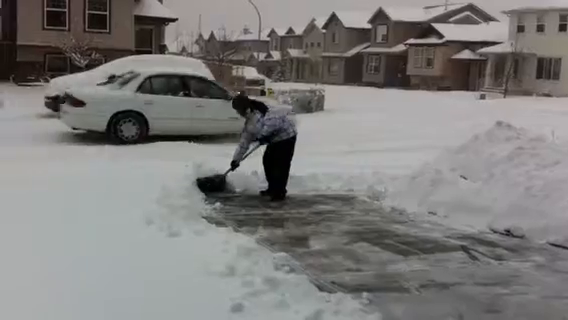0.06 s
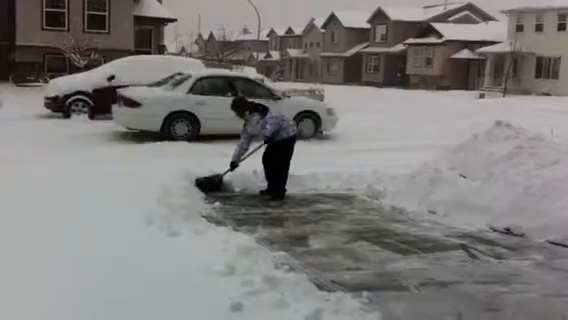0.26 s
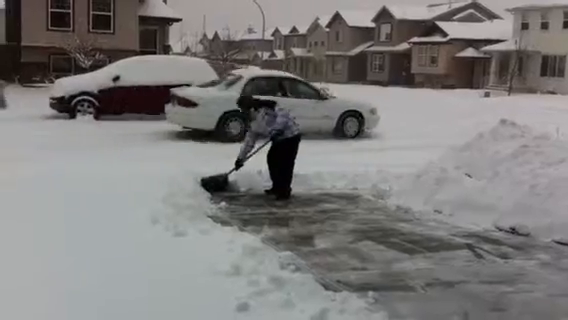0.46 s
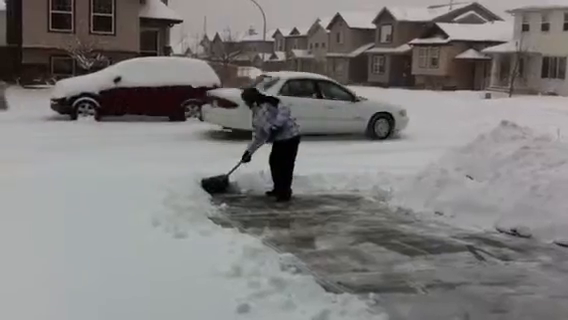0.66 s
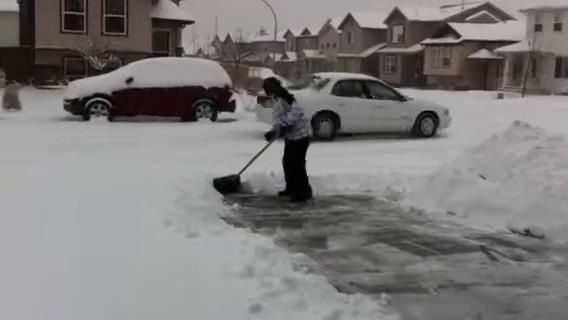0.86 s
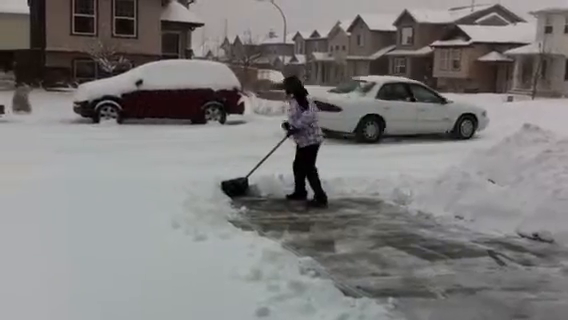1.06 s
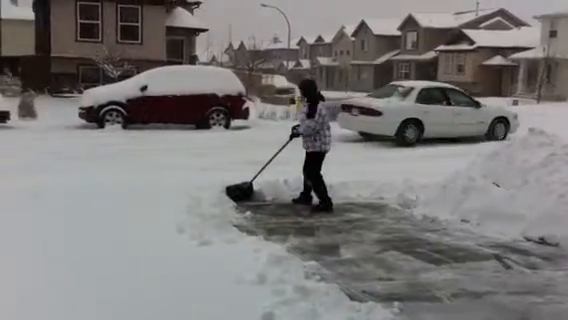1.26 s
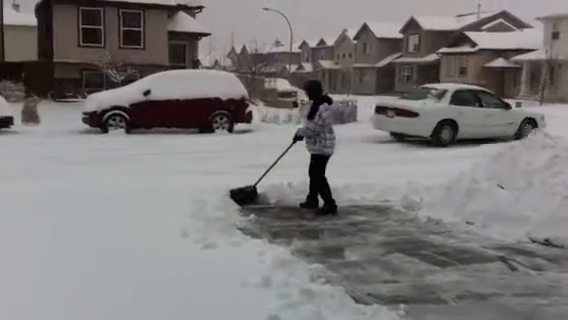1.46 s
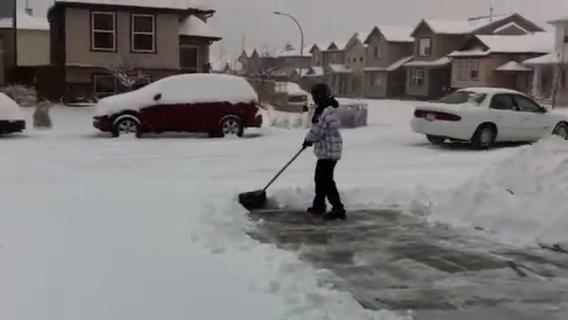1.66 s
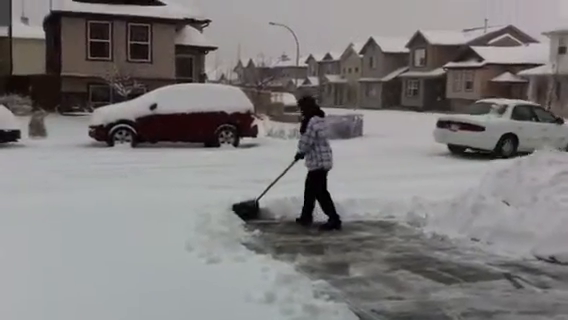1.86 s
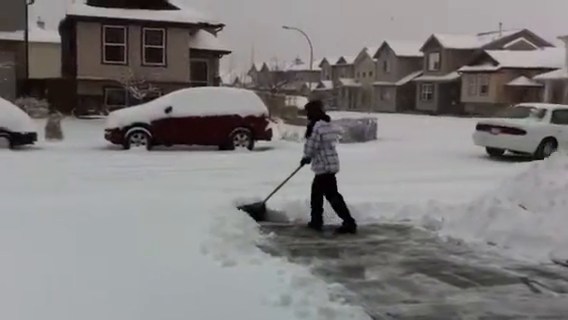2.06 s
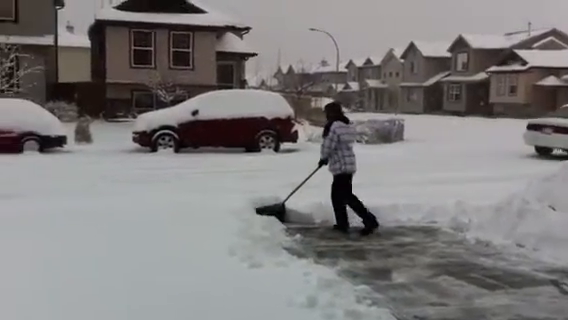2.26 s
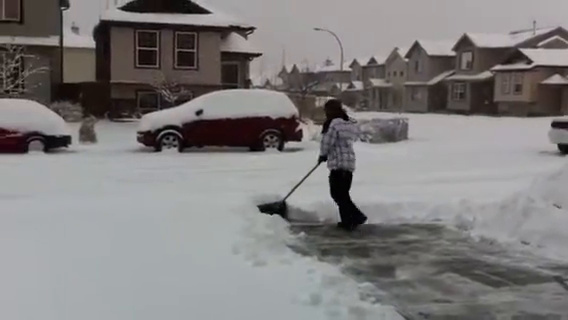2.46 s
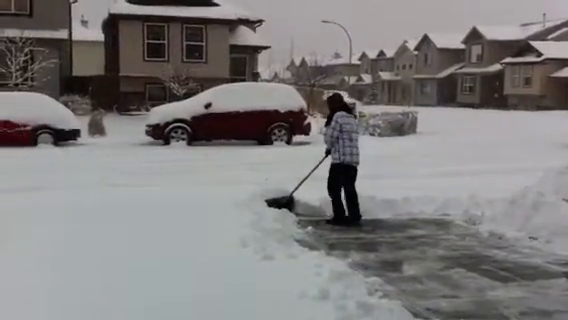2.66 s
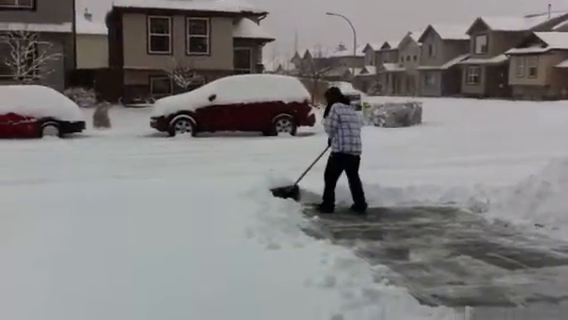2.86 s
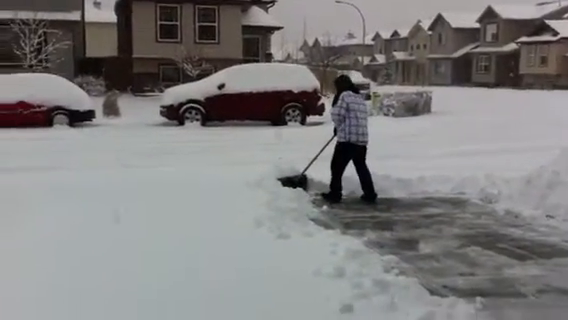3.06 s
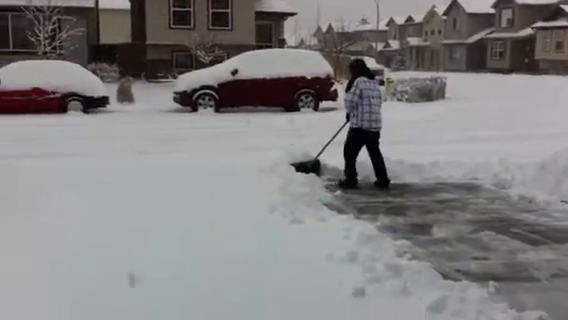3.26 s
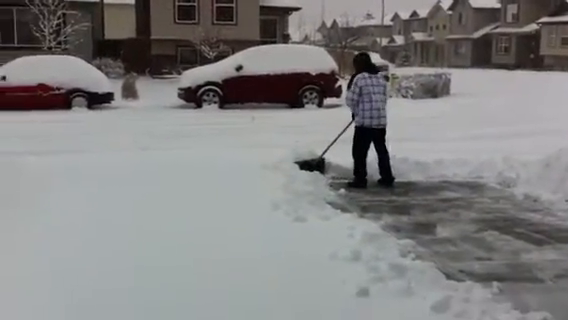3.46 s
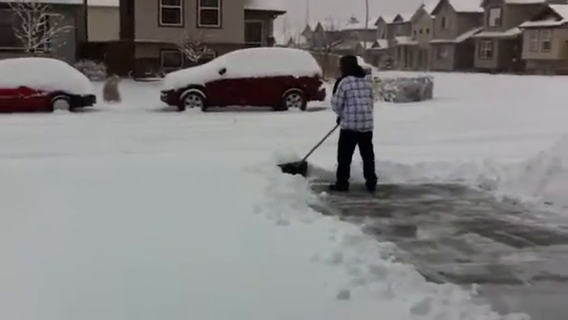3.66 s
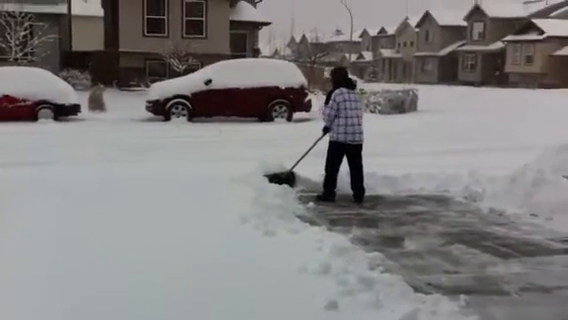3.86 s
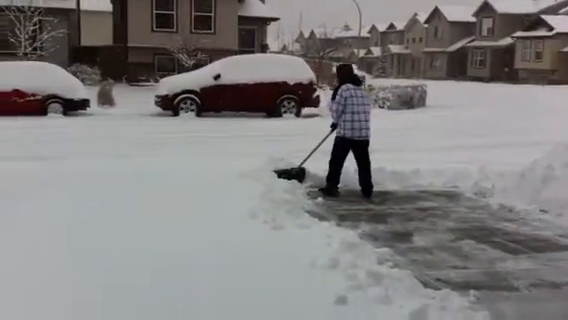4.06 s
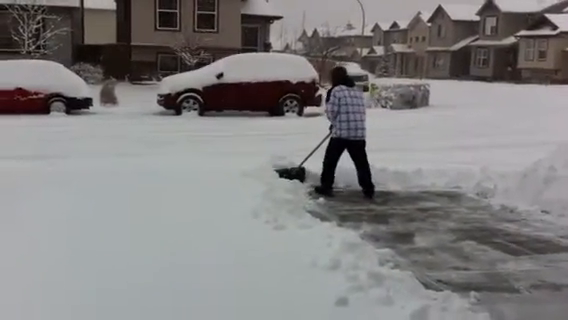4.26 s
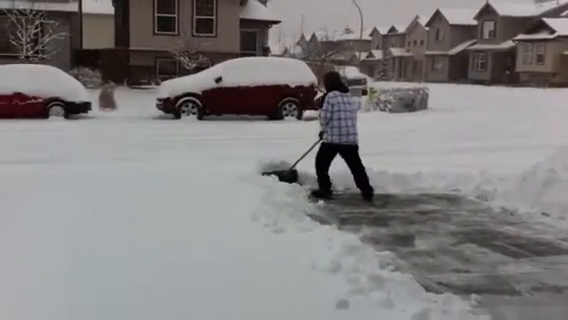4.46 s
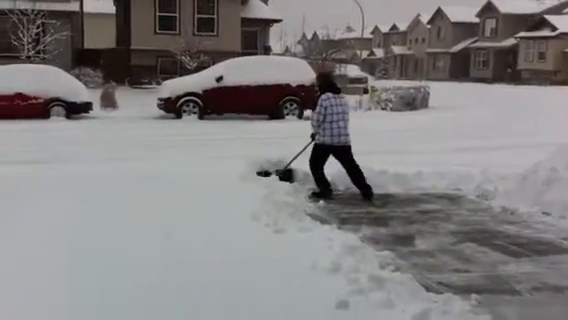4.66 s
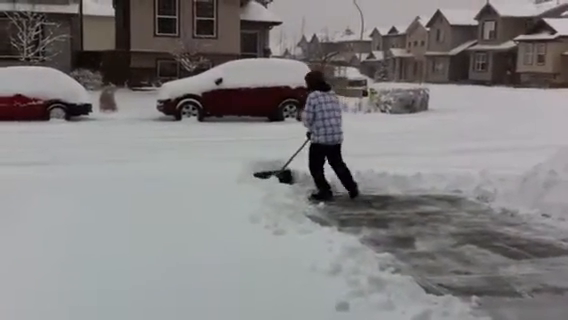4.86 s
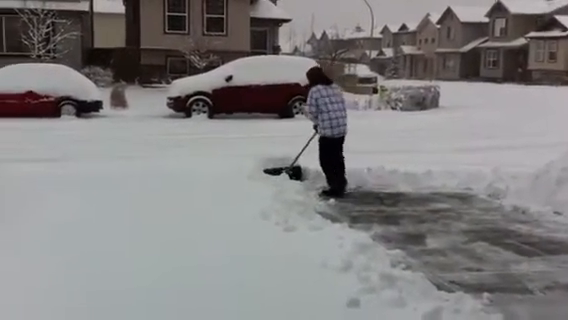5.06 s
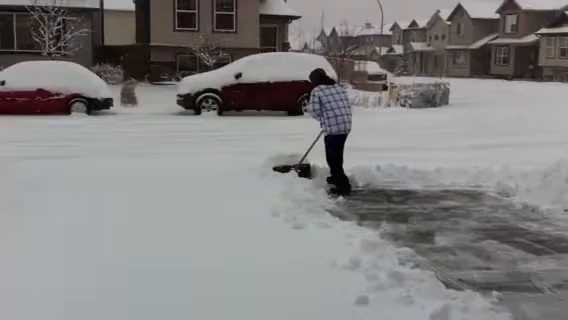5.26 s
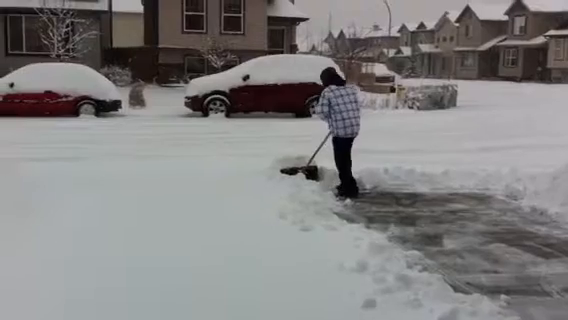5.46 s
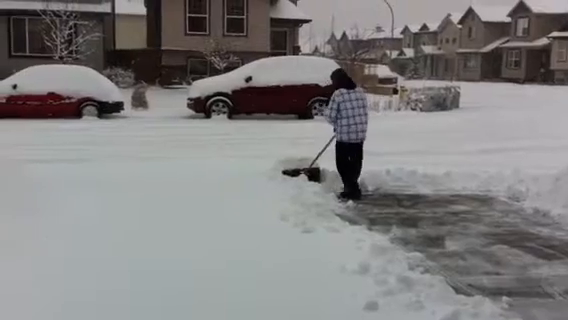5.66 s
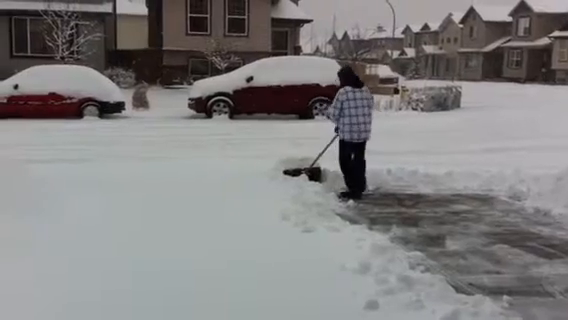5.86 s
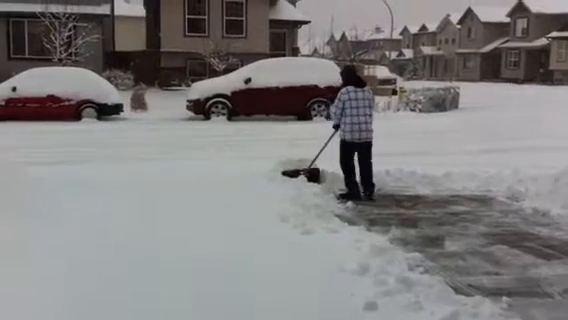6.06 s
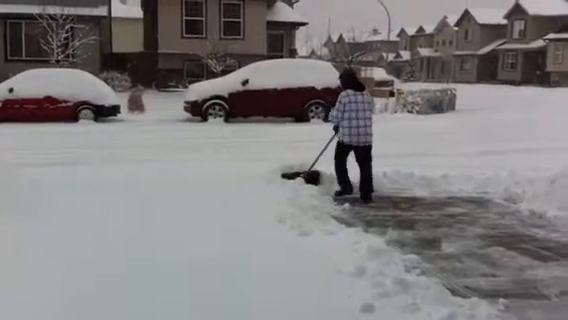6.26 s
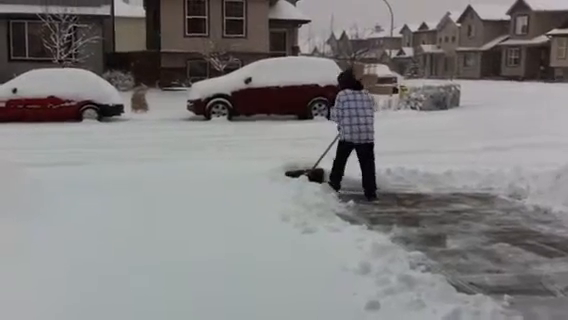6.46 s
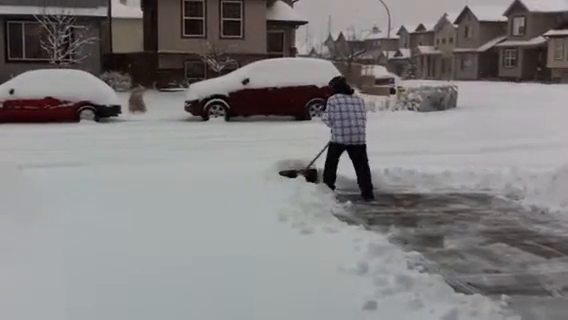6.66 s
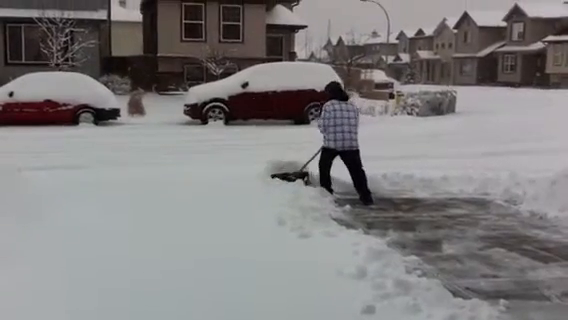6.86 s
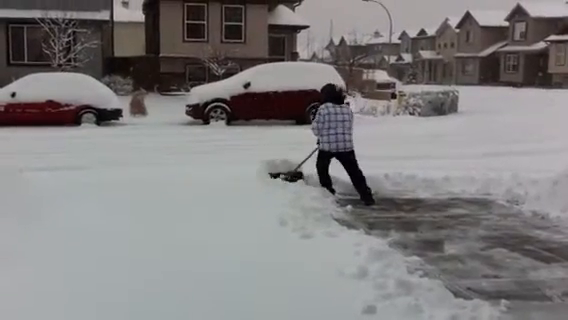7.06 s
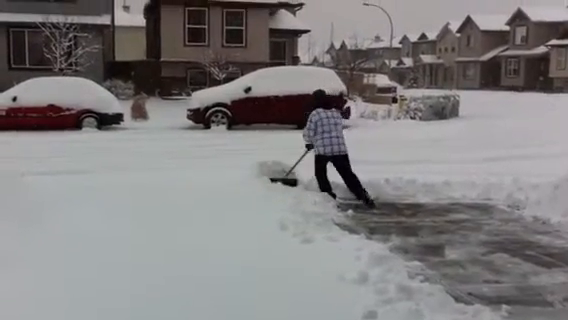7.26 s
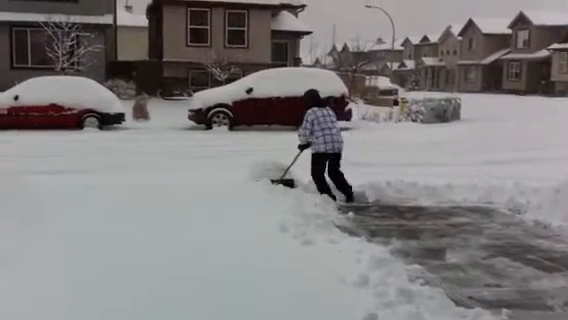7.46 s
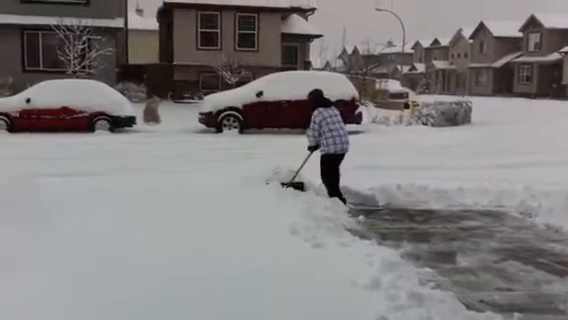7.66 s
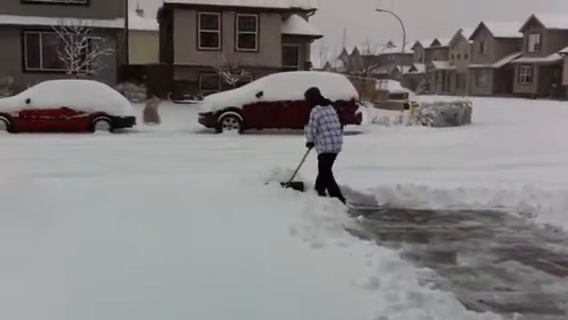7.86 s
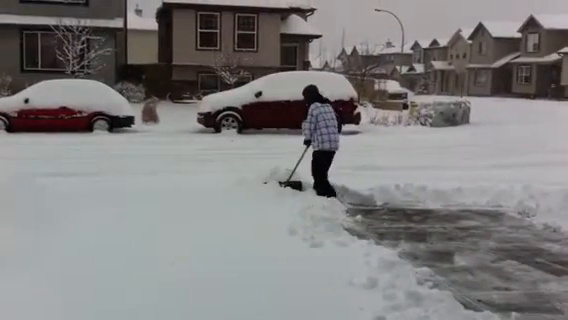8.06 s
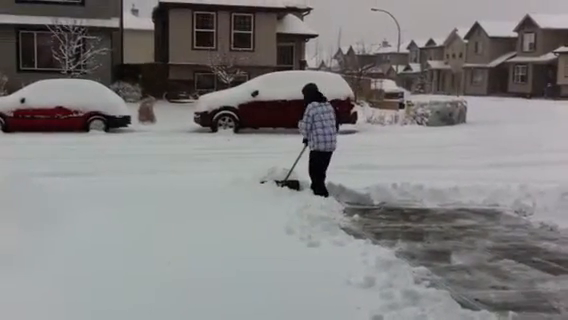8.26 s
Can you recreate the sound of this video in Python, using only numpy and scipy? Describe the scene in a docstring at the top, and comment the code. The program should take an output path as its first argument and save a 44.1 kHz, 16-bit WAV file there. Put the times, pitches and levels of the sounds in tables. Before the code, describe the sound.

Outdoors on a residential street, a snow shovel gives one loud, bright scrape at the very start, then falls nearly quiet as a car passes softly and rolls away. Small nudges and chatters lead to further rasping pushes, some long, some short, with ice snaps and dull scoop knocks. Gaps reveal low distant traffic and microphone hiss, with a faint echo off houses.

```python
"""A snow shovel scrapes an icy paved driveway: a hard push at once, while a car passes nearest at 1 s and rolls away.
Light nudges and skates lead to a long push at 1.9 s, a short one at 3 s, and long ones at 4.3 s and 6.6 s.
Friction noise rings the blade and booms in the loaded scoop; damped bursts give the snaps of ice and dull bumps.
House fronts answer faintly throughout, over shaped noise for far traffic and microphone hiss."""
import sys
import numpy as np
from scipy import signal
from scipy.fft import rfft, irfft, next_fast_len
from scipy.io import wavfile
from scipy.ndimage import uniform_filter1d

SR = 44100
rng = np.random.default_rng(int(sys.argv[2]) if len(sys.argv) > 2 else 0)


def unload_audio(sound):
    """Save the sound as a 16-bit wav file, at the path given as the first command line argument."""
    columns = np.transpose(np.atleast_2d(sound))
    # keep every value between -1 and 1, then stretch to whole-number steps
    steps = np.round(np.clip(columns, -1, 1) * 32767)
    wavfile.write(sys.argv[1], SR, steps.astype(np.int16))


N = 366987

# Resonances of the blade in the first push, which also colour the catches.
# Each row: frequency in Hz, width in Hz, relative level in dB.
FIRST_PUSH_MODES = [(523, 70, -5), (780, 120, -5), (913, 92, -0.5), (1550, 130, 1), (2330, 150, -5),
                    (3820, 800, -12.5), (5310, 260, 0.5), (6130, 160, -9.5), (8470, 280, -5.5),
                    (10900, 380, -8)]
# Broad spectrum of the scraping blade beneath its resonances. Each row: frequency in Hz, relative level in dB.
SCRAPE_SPECTRUM = [(400, -8.5), (560, -7), (700, -6.5), (1000, -2), (1250, -6.5), (1950, -1.5), (2450, -8),
                   (2900, -13), (4000, -10), (5300, -9.5), (7000, -11), (9500, -12), (13000, -13),
                   (15800, -20.5)]
RASP_HZ, GRIT_HZ = 450, 2800  # lower edges of the blade's rasp and of the bright hiss


def strokes():
    """Stick-slip friction: one rough force drives four long pushes, a short one and light nudges."""
    # Resonances shift with the blade's angle and load, one table for each later push.
    # Each row: frequency in Hz, width in Hz, relative level in dB.
    modes_2 = [(523, 200, -6.5), (764, 59, -3.5), (1010, 170, -11), (1530, 160, -6), (1880, 230, -7),
               (2400, 92, -2), (5450, 260, -4), (6250, 200, -7), (8400, 260, -7.5)]
    modes_short = [(780, 95, 4), (1000, 130, 0), (1620, 200, -4), (4920, 260, -3.5), (6100, 200, -3.5),
                   (7600, 250, -6)]
    modes_3 = [(586, 100, -10), (1160, 280, -2), (1510, 150, 0.5), (1830, 110, 0), (2390, 70, -0.5),
               (5000, 200, -4.5), (5740, 200, -3.5), (8400, 250, -9)]
    modes_4 = [(590, 57, 1.5), (935, 230, 2), (1510, 140, -7), (1860, 120, -4), (2300, 130, -2.5),
               (4870, 190, -3.5), (5600, 170, -4.5), (10500, 500, -8.5)]
    # Resonances of the lightly loaded blade in the nudges, with the same columns.
    modes_light = [(814, 35, 1), (1800, 500, -2), (4900, 220, 1), (5700, 400, -0.5), (6000, 140, -5),
                   (7600, 250, -4), (13800, 1600, -10.5)]
    # How hard the blade is driven until the arms let up. Each row: time in seconds, effort in dB.
    effort_1 = [(0.013, -30.5), (0.045, -32), (0.08, -35.5), (0.125, -33), (0.155, -41), (0.215, -33),
                (0.259, -36)]
    effort_2 = [(1.87, -66), (1.92, -55), (1.96, -46.5), (2.1, -42.5), (2.2, -42.5), (2.33, -42.5),
                (2.43, -44), (2.47, -42.5), (2.53, -45.0)]
    effort_short = [(2.97, -61), (3.01, -52.5), (3.07, -47.5), (3.13, -48.5)]
    effort_3 = [(4.27, -67), (4.325, -60), (4.38, -45), (4.5, -42.5), (4.58, -39.5), (4.63, -43.5)]
    effort_4 = [(6.63, -66.5), (6.68, -52.5), (6.825, -52.0), (6.87, -42.5), (6.96, -49.5), (7.005, -45),
                (7.05, -47.0), (7.1, -44.5), (7.15, -48.5)]
    # Balance of each push; boom, rasp and hiss are relative to the effort, halfway through. Each row: scoop
    # pitch in Hz, boom in dB, rasp in dB, hiss in dB, dulling in dB/s, growth of the boom in dB/s, run-out in dB/s.
    push_balance = [(240, -12, -6, -1.1, 3, 19, 128), (222, -8.5, -3.5, -2, 9, -11, 144),
                    (224, -6.5, -4.5, -4.5, -26, 0, 133), (244, -4, -2.8, -3, -0.5, -5, 55.5),
                    (219, -1.5, -2, -3, -4, 1, 60)]
    # Light nudges of the blade. Each row: start in seconds, rise in seconds, hold in seconds,
    # scoop rumble in dB, blade rasp in dB, grit hiss in dB.
    nudge_rows = [(1.053, 0.03, .015, -75, -67, -65.5), (1.264, .012, 0.076, -68, -64, -57),
                  (1.766, .008, 0.063, -77, -66.5, -60.5), (4.017, 0.072, 0.18, -62, -66, -67.5),
                  (6.168, .02, 0.023, -83, -64, -63), (6.242, 0.095, 0.052, -64.5, -64.5, -69.5),
                  (7.456, 0.023, 0.053, -56.5, -65.5, -67), (7.842, 0.016, 0.046, -66.5, -70.5, -75)]
    nudge_fade_db_per_s = 141
    chips_per_s, chip_db = 110, -11  # coarse crumbs of ice crushed under a loaded edge
    uneven_db, uneven_per_s = 0.53, 45  # patches of rough and smooth ice under the edge

    slip = unit(wobble(60) + wobble(220))  # the edge sticks and slips
    force = grit(rate=1800, scatter_db=3.5, smooth=1.0) * amp(1.25 * slip)
    force = flex(force, depth_db=2)  # single modes come and go
    force = flex(force, depth_db=2.1, order=22, size=2)  # the contact point wanders along the edge

    chips = grit(rate=chips_per_s, scatter_db=7.0, smooth=0)
    crushing = force + amp(chip_db) * chips
    crushing = crushing * amp(uneven_db * wobble(uneven_per_s))

    efforts = [effort_1, effort_2, effort_short, effort_3, effort_4]
    mode_tables = [FIRST_PUSH_MODES, modes_2, modes_short, modes_3, modes_4]
    heavy = np.zeros(N)
    for effort, modes, balance in zip(efforts, mode_tables, push_balance):
        heavy += push(crushing, effort, modes, *balance)

    light_levels = np.zeros((3, N))
    for start, rise, hold, *levels_db in nudge_rows:
        movement = envelope(start, rise, hold, nudge_fade_db_per_s)
        light_levels += np.outer(amp(levels_db), movement)
    return heavy + scrape(force, light_levels, modes_light, boom_hz=225, broad_db=5)


def push(force, effort, modes, boom_hz, boom_db, rasp_db, hiss_db, dulling, growth, fade_db_per_s):
    """Loading of a radiator: effort sets the level, gathering snow shifts hiss against rasp and changes the boom."""
    grip_s = 0.0027  # the edge takes hold this fast
    rasp_share = 0.68  # part of the lost hiss that the rasp gains, in dB per dB
    s, db = np.transpose(effort)
    t = np.arange(N) / SR
    grip = np.clip(1 + (t - s[0]) / grip_s, 0, 1)
    drive = amp(np.interp(t, s, db)) * grip * run_out(t - s[-1], fade_db_per_s)
    travel = np.clip(t, s[0], s[-1]) - (s[0] + s[-1]) / 2  # seconds from the middle of the push
    balance_db = [boom_db + growth * travel,
                  rasp_db + rasp_share * dulling * travel,
                  hiss_db - dulling * travel]
    return scrape(force, drive * amp(balance_db), modes, boom_hz, broad_db=0.0)


def scrape(force, levels, modes, boom_hz, broad_db):
    """Source and filter: one friction force drives the scoop's boom, the blade's rasp and a bright hiss."""
    # Resonance of the scoop. Each row: multiple of the boom's frequency, relative level in dB.
    scoop_shape = [(.11, -35), (.27, -32), (.42, -21.5), (.58, -8), (.76, -3), (1, -1), (1.3, -3),
                   (1.65, -9), (2.3, -16.5), (4, -47)]
    blade = resonant(SCRAPE_SPECTRUM, modes, broad_db)
    scoop = [(boom_hz * multiple, db) for multiple, db in scoop_shape]
    colours = [lambda hz: amp(along(scoop, hz)),
               lambda hz: blade(hz) * band(hz, RASP_HZ, GRIT_HZ),
               lambda hz: blade(hz) * band(hz, GRIT_HZ, SR)]
    out = np.zeros(N)
    touching = levels[0] > 0
    for level, colour in zip(levels, colours):
        out[touching] += level[touching] * unit(filtered(force[touching], colour))
    return out


def grit(rate, scatter_db, smooth):
    """Shot noise with dispersion: tiny impacts of uneven size, rate a second, over smooth sliding noise."""
    sizes = amp(scatter_db * rng.standard_normal(N)) * rng.choice([-1, 1], N)
    hits = (rng.random(N) < rate / SR) * sizes
    # bending waves cross the blade at unequal speeds and smear each impact over two milliseconds
    delays = rng.uniform(0, .002, 200)

    def dispersion(hz):
        lag = np.interp(hz, np.linspace(0, SR / 2, len(delays)), delays)
        return np.exp(-2j * np.pi * np.cumsum(lag) * hz[1])  # phase is the sum of delay over frequency

    return unit(filtered(hits, dispersion)) + smooth * rng.standard_normal(N)


def flex(x, depth_db, order=3, size=9):
    """Modal modulation: bending varies patches of close modes, order bins wide and size frames long."""
    z = signal.stft(x, nperseg=2048)[2]
    field = uniform_filter1d(rng.standard_normal(z.shape), order, axis=0)
    field = uniform_filter1d(field, size, axis=1)
    return signal.istft(z * amp(depth_db * unit(field)), nperseg=2048)[1][:N]


def skates():
    """Forced resonance: brief chatter of the lightly weighted edge rings a narrow group of blade modes."""
    # Skating movements. Each row: start in seconds, rise in seconds, hold in seconds, fade in dB/s,
    # chatter in dB, hiss in dB.
    skate_rows = [(1.329, 0.16, 0.059, 123, -54.5, -60.5), (2.644, 0.03, .015, 43, -47.5, -51),
                  (3.441, 0.0056, 0.04, 158, -60.5, -61), (3.77, 0.02, 0.019, 164, -52, -59.5)]
    # Blade modes, one list a skate. Each row of a list: frequency in Hz, width in Hz, relative level in dB.
    chatter_modes = [
        [(620, 210, -9), (1570, 180, 2), (1800, 160, 5.5)],
        [(1540, 210, 0.5), (1930, 240, 0), (2170, 150, 1)],
        [(1780, 260, 4), (2190, 400, -2)],
        [(1500, 87, -17), (1890, 120, 4), (2350, 810, -7.5)],
    ]
    # Broad spectrum beneath the modes. Each row: frequency in Hz, relative level in dB.
    skate_spectrum = [(120, -32), (250, -7), (420, -16), (800, -6.5), (1250, -53), (2700, -12), (3500, -10),
                      (5500, -5), (7500, -12.5), (10000, -12.5), (13000, -12.5), (16000, -21)]
    out = np.zeros(N)
    force = flex(grit(rate=1100, scatter_db=-1.5, smooth=0.79), depth_db=2.5)
    for (start, rise, hold, fade, chatter_db, hiss_db), modes in zip(skate_rows, chatter_modes):
        blade = resonant(skate_spectrum, modes, broad_db=0.0)
        ring = unit(filtered(force, lambda hz: blade(hz) * band(hz, 100, GRIT_HZ)))
        fizz = unit(filtered(force, lambda hz: blade(hz) * band(hz, GRIT_HZ, SR)))
        out += envelope(start, rise, hold, fade) * (amp(chatter_db) * ring + amp(hiss_db) * fizz)
    return out


def catches():
    """Impact excitation: ridges of ice snap at the edge, from low clacks of the blade to high splintering."""
    # Catches on ridges of ice. Each row: start in seconds, level in dB (rms of the same energy held for 2 ms),
    # centre pitch in Hz, spread in octaves, decay time to -60 dB in seconds.
    catch_rows = [(.178, -23.5, 4800, 0.66, .02), (0.44, -41, 11000, 1.6, 0.033),
                  (1.273, -42.5, 4820, 0.57, 0.023), (1.284, -47, 4900, .5, .014),
                  (1.295, -42, 5000, 0.42, .015), (1.306, -44, 4900, .55, 0.023),
                  (1.36, -46.5, 4780, 0.62, .02), (1.479, -39.5, 9000, 0.91, 0.043),
                  (1.771, -38, 4550, .6, 0.05), (1.826, -47, 5200, 0.77, 0.01),
                  (1.924, -42, 3000, 1.7, .025), (1.941, -32.5, 11000, 0.92, 0.015),
                  (1.962, -37, 3400, 0.87, 0.022), (1.999, -34, 5900, 0.44, 0.014),
                  (2.124, -35, 10000, 0.64, .014), (2.198, -34.5, 4500, 1.7, .038),
                  (2.384, -34, 1710, 0.48, 0.02), (2.456, -32.5, 2800, 1.1, 0.051),
                  (2.47, -32.5, 1700, .55, .015), (2.665, -44, 1900, 0.57, 0.032),
                  (2.694, -35.5, 1940, 0.35, .06), (3.013, -36, 1770, 0.6, 0.032),
                  (3.034, -53, 11030, 0.86, 0.02), (3.45, -47, 1900, 0.32, .038),
                  (3.774, -52, 4300, .7, 0.032), (3.793, -50, 1960, 0.44, .03),
                  (4.112, -51.5, 2000, 1.5, 0.028), (4.172, -40, 4370, 0.72, .009),
                  (4.201, -44.5, 2820, 1.7, 0.027), (4.339, -42, 2500, 2.1, .05),
                  (4.373, -46, 2200, 1.5, 0.025), (4.464, -35.5, 2000, 0.9, 0.04),
                  (4.577, -33.5, 2820, 1.3, .04), (4.864, -36, 1880, .35, 0.024),
                  (6.668, -40, 2020, 0.75, 0.033), (6.716, -45, 12000, .8, .011),
                  (6.748, -40.5, 2200, 1.3, 0.015), (6.837, -34.5, 1800, 0.31, 0.018),
                  (6.861, -32.5, 2300, 1, 0.033), (6.993, -31, 8100, 1, 0.054),
                  (7.014, -33.5, 9000, 2.3, 0.022), (7.168, -34, 5000, 1.5, 0.013),
                  (7.246, -41.5, 7000, 1, .012), (7.409, -50, 11500, 0.19, .012),
                  (7.857, -58.5, 1800, .6, 0.043)]
    out = np.zeros(N + SR)
    t = np.arange(SR // 8) / SR
    blade = resonant(SCRAPE_SPECTRUM, FIRST_PUSH_MODES, broad_db=4.5)
    for s, db, pitch_hz, spread, t60 in catch_rows:
        fade = amp(-60 * t / t60) * (1 - np.exp(-t / 0.0011))

        def contact(hz):
            octaves = np.log2((hz + 1) / pitch_hz)
            return np.exp(-.5 * (octaves / spread) ** 2) + amp(-20.5)

        snap = fade * filtered(rng.standard_normal(len(t)), lambda hz: blade(hz) * contact(hz))
        same_energy = np.sqrt(0.002 * SR / np.sum(snap ** 2))
        out[round(s * SR):][:len(t)] += amp(db) * snap * same_energy
    return out[:N]


def bumps():
    """Damped oscillation: dull knocks of scoop and boots, with no deep bass beneath them."""
    # Bumps. Each row: start in seconds, level in dB before the 3 dB lift and the band-pass, pitch in Hz,
    # decay time to -60 dB in seconds.
    bump_rows = [(.438, -44.5, 570, 0.038), (2.158, -29, 232, 0.027), (2.404, -33, 204, 0.042),
                 (2.664, -33.5, 327, 0.03), (2.673, -31, 256, 0.035), (4.111, -45.5, 176, 0.11),
                 (5.336, -53.5, 221, 0.11), (5.730, -48.5, 770, 0.019), (6.864, -37, 185, 0.1),
                 (7.112, -36, 184, 0.17), (7.164, -35, 242, 0.041), (7.593, -54, 237, 0.058)]
    out = np.zeros(N + SR)
    t = np.arange(SR // 4) / SR
    for s, db, hz, t60 in bump_rows:
        ring = np.sin(2 * np.pi * hz * t) + 0.12 * np.sin(2 * np.pi * 1.43 * hz * t)
        decay = amp(db + 3.0 - 60 * t / t60)
        out[round(s * SR):][:len(t)] += decay * ring * (1 - np.exp(-t / 0.0014))
    return filtered(out[:N], lambda hz: band(hz, 105, 1500, order=6))


def houses(x):
    """Diffuse reflection: a thin scattered answer from the house fronts, whose treble dies first."""
    # Reverberation of the street. Each row: frequency in Hz, decay time to -60 dB in seconds.
    street_decay = [(200, 0.96), (2000, 0.75), (6000, 0.48), (14000, 0.25)]
    hz, t, z = signal.stft(rng.standard_normal(SR), SR, nperseg=256)
    decay = amp(-60 * t / along(street_decay, hz)[:, None])
    tail = signal.istft(z * decay, SR, nperseg=256)[1]
    delayed = np.pad(x, (round(.02 * SR), 0))  # 20 ms before the first answer
    return signal.fftconvolve(delayed, tail / np.linalg.norm(tail))[:N]


def street():
    """Inverse-distance law: a car passes and fades over steady far traffic and microphone hiss."""
    # Spectra of engine rumble, tyre noise and microphone hiss. Each row: frequency in Hz, relative level in dB.
    rumble_spectrum = [(25, -33), (54, -24), (90, -7), (120, -3.5), (190, -0.5), (290, 1.5), (380, -5),
                       (560, -6), (680, -8), (780, -5.5), (1000, -14.5), (1500, -44)]
    tyre_spectrum = [(600, -20), (1000, 2.5), (1700, 2), (2300, -6.5), (5500, -9), (8000, -21.5),
                     (16000, -13)]
    hiss_spectrum = [(1500, 1.5), (3500, 1.5), (8000, 0), (11000, 0), (14500, 3.5), (16000, -0.5)]
    nearest_s, pass_s = 1, 0.98  # when the car is closest, and the time it takes to cover that distance
    car_rumble_db, car_tyres_db = -66, -69.5  # at the closest point
    far_rumble_db, far_tyres_db, hiss_db = -66.5, -74, -69.5
    t = np.arange(N) / SR
    nearness = 1 / np.hypot(1, (t - nearest_s) / pass_s)
    # near and far sources add in power
    rumble = np.hypot(amp(far_rumble_db), amp(car_rumble_db) * nearness)
    tyres = np.hypot(amp(far_tyres_db), amp(car_tyres_db) * nearness)
    traffic = rumble * noise(rumble_spectrum) + tyres * noise(tyre_spectrum)
    return traffic + amp(hiss_db) * noise(hiss_spectrum)


def envelope(start, rise, hold, fade_db_per_s):
    """Amplitude envelope: the gain of one movement rises, holds and runs out."""
    t = np.arange(N) / SR - start
    return np.clip(t / rise, 0, 1) * run_out(t - rise - hold, fade_db_per_s)


def run_out(t, fade_db_per_s):
    """Exponential decay: the gain of a blade that slows from t = 0 and is then lifted."""
    lift_s, lift_fade_s = 0.32, 0.071  # the blade leaves the ground after this long, and this gradually
    t = np.maximum(t, 0)
    return amp(-fade_db_per_s * t) * np.clip(1 - (t - lift_s) / lift_fade_s, 0, 1)


def resonant(colour, modes, broad_db):
    """Modal superposition: gain against frequency of resonance peaks, added in power to a broad spectrum."""
    grid = np.geomspace(20, SR / 2, num=2000)
    peaks = sum(amp(db) ** 2 / (1 + (2 * (grid - hz) / width) ** 2) for hz, width, db in modes)
    gain = np.sqrt(peaks + amp(along(colour, grid) + broad_db) ** 2)
    return lambda hz: np.interp(hz, grid, gain)


def noise(colour):
    """Coloured noise: random samples of rms 1 shaped by (Hz, dB) points."""
    return unit(filtered(rng.standard_normal(N), lambda hz: amp(along(colour, hz))))


def wobble(rate):
    """Random modulation: a curve of rms 1 through rate random knots a second."""
    knots = rng.standard_normal(int(N * rate / SR) + 2)
    return unit(np.interp(np.arange(N) * rate / SR, np.arange(len(knots)), knots))


def filtered(x, response):
    """Linear filtering: the spectrum of x times a response of frequency."""
    m = next_fast_len(len(x) + 4096, True)
    hz = np.fft.rfftfreq(m, 1 / SR)
    return irfft(rfft(x, m) * response(hz), m)[:len(x)]


def band(hz, lo, hi, order=12):
    """Band-pass response: gain with steep skirts below lo and above hi."""
    return 1 / np.sqrt((1 + (lo / (hz + 1)) ** order) * (1 + (hz / hi) ** order))


def along(points, hz):
    """Logarithmic pitch scale: (Hz, value) points interpolated on a log frequency axis."""
    f, v = np.transpose(points)
    return np.interp(np.log(hz + 1), np.log(f + 1), v)


def amp(db):
    """Decibel law: level to amplitude gain."""
    return 10 ** (np.asarray(db) / 20)


def unit(x):
    """Power normalization: x at rms 1."""
    return x / np.sqrt(np.mean(x ** 2) + 1e-20)


def scene():
    """Superposition: the shovel, its echo and the street add."""
    shovel = strokes() + skates() + catches() + bumps()
    return (shovel + amp(-11.0) * houses(shovel) + street())[None]


def record(dry):
    """Band limiting: the camera keeps nothing from 15.9 kHz up."""
    return filtered(dry[0], lambda hz: hz < 15900)[None]


dry = scene()
out = record(dry)
unload_audio(out)
```